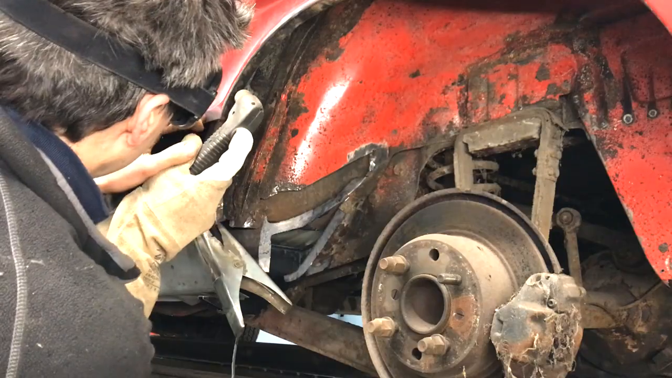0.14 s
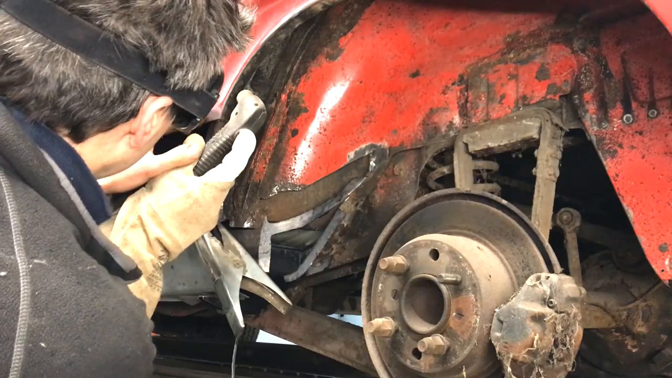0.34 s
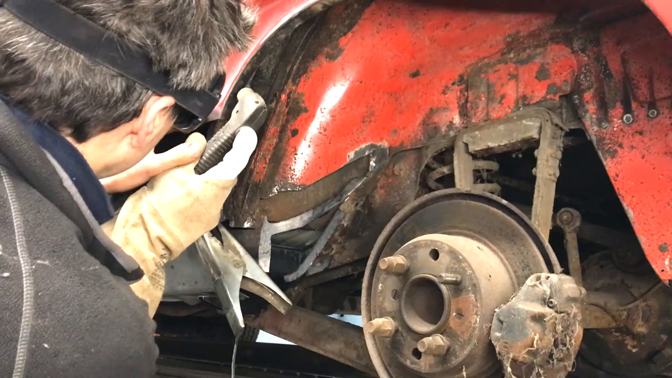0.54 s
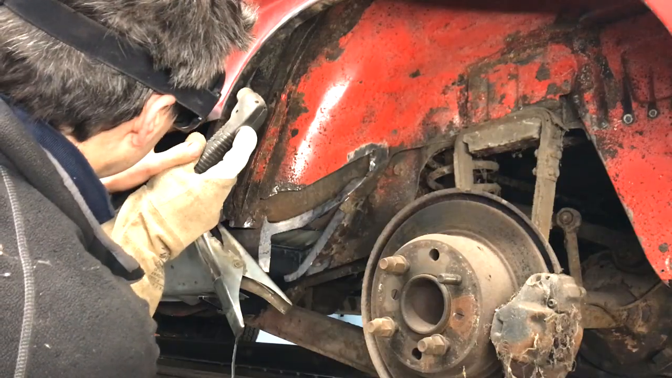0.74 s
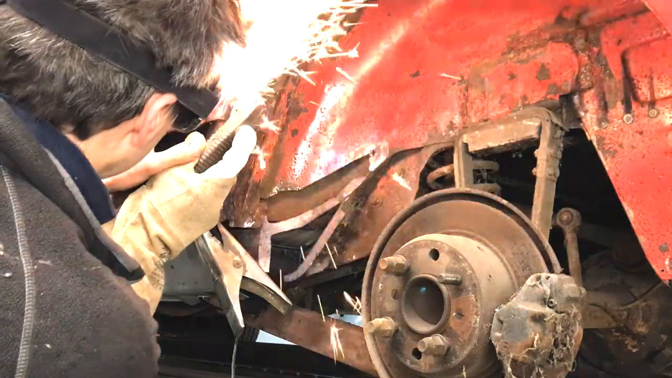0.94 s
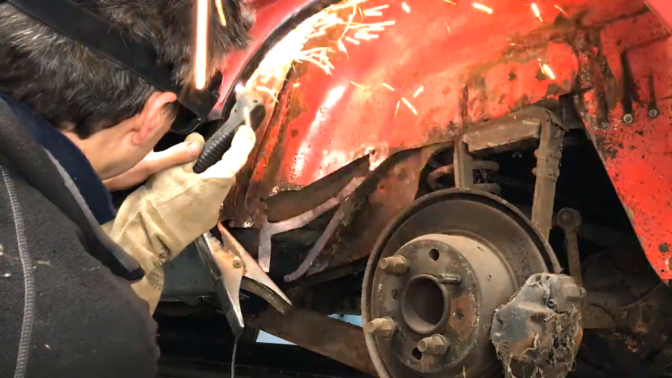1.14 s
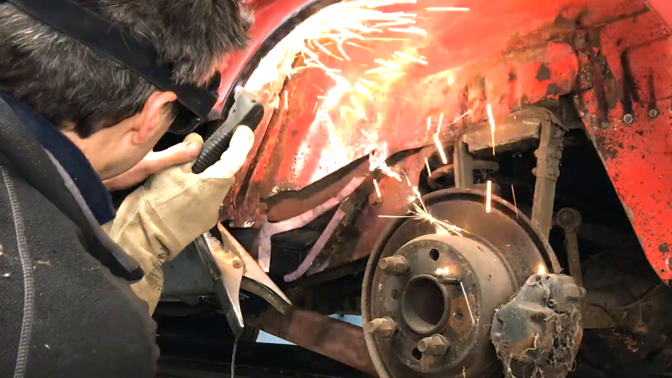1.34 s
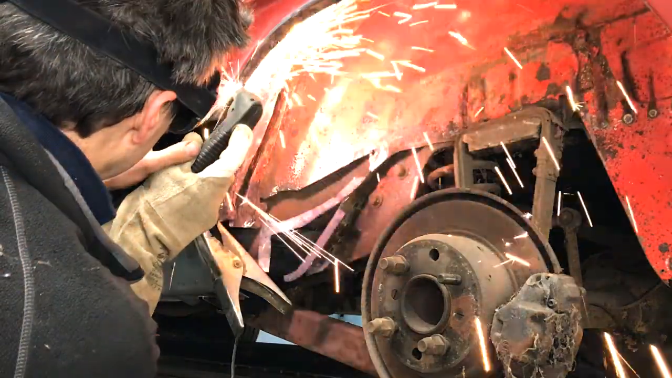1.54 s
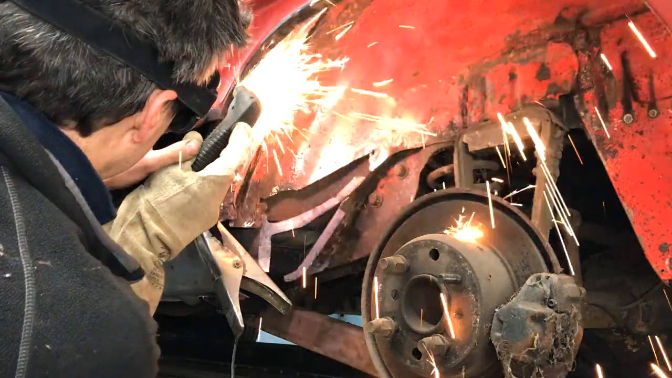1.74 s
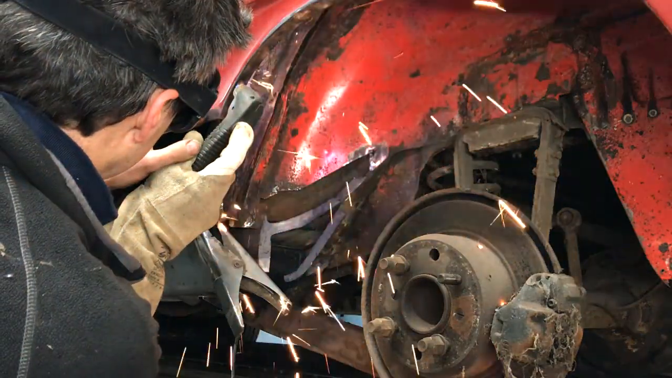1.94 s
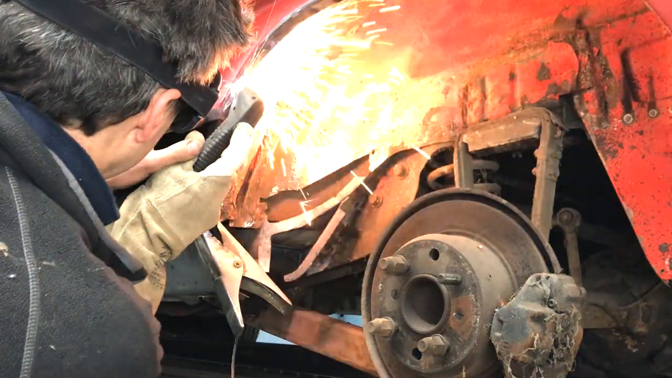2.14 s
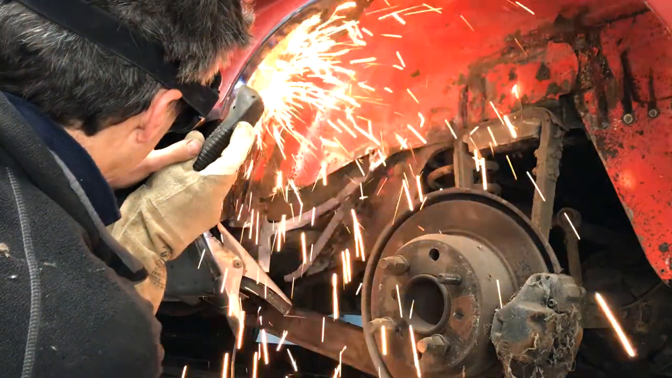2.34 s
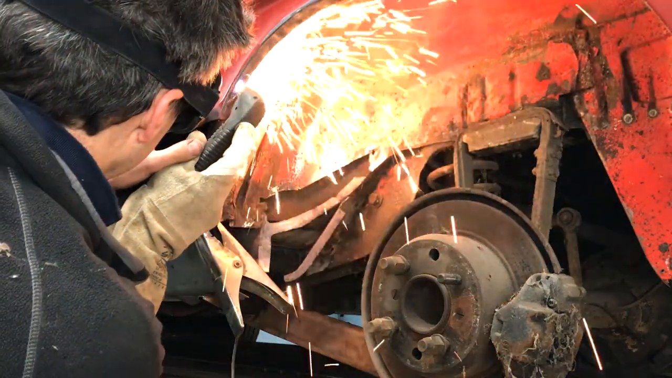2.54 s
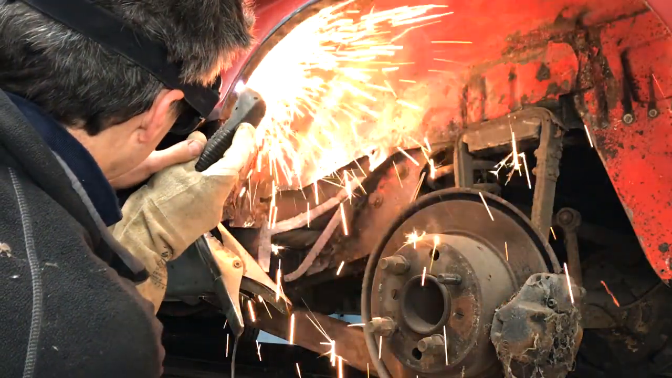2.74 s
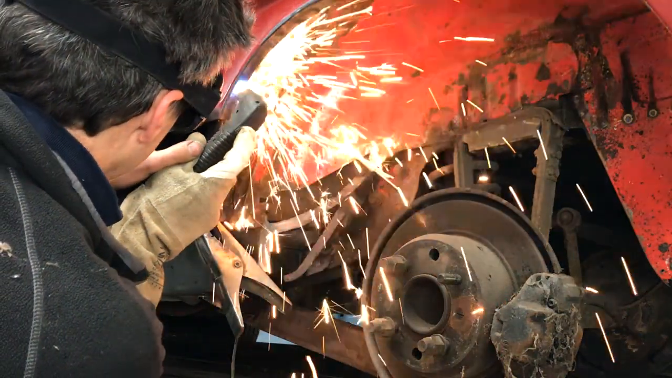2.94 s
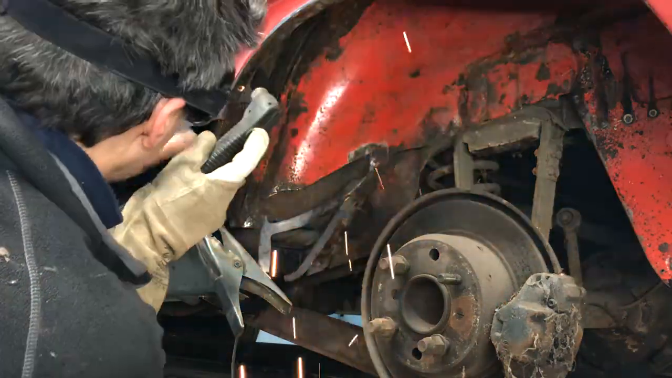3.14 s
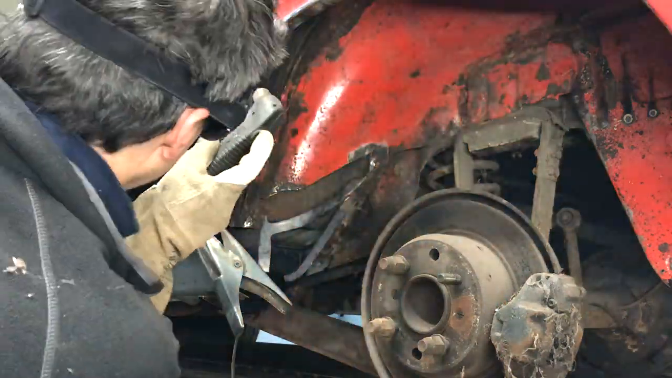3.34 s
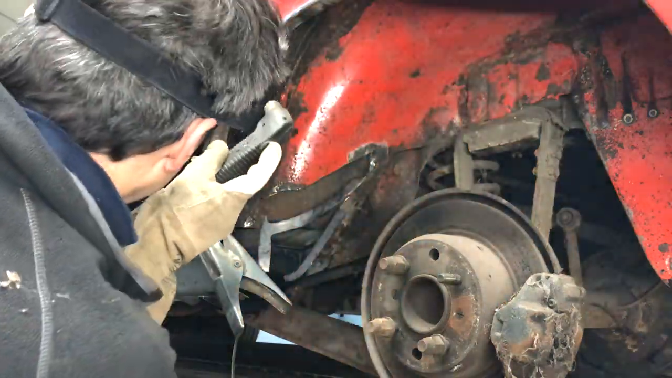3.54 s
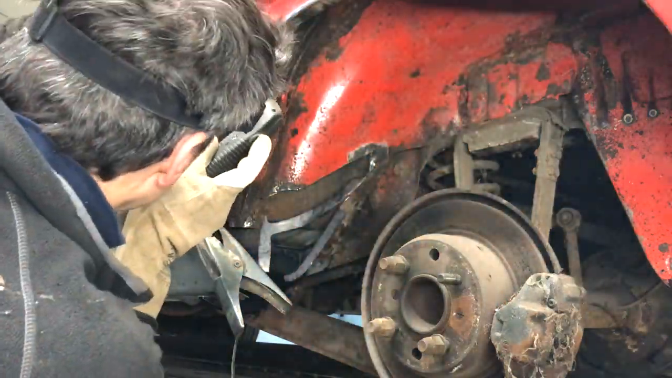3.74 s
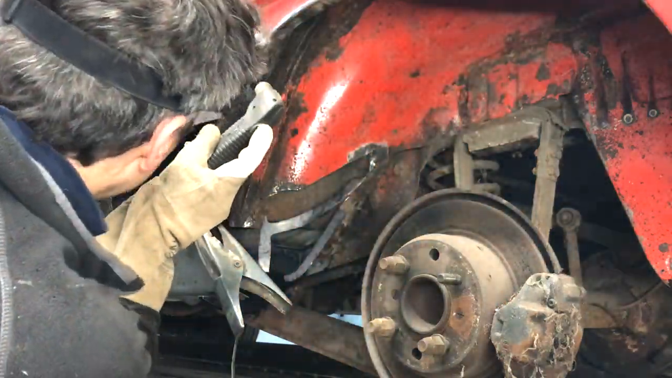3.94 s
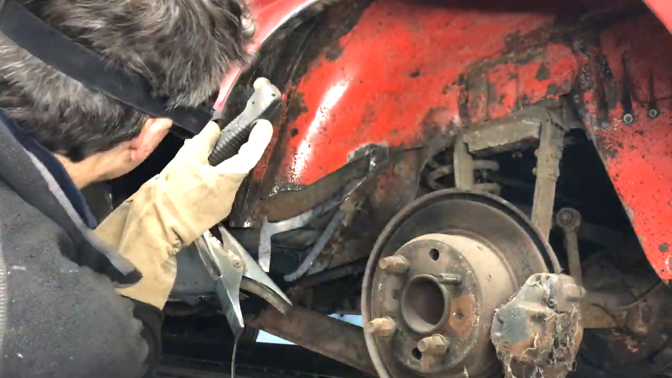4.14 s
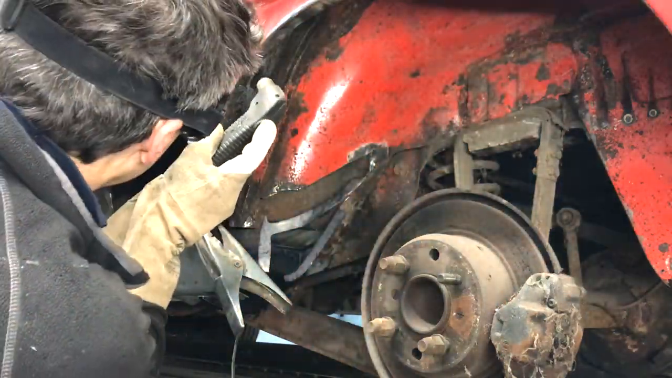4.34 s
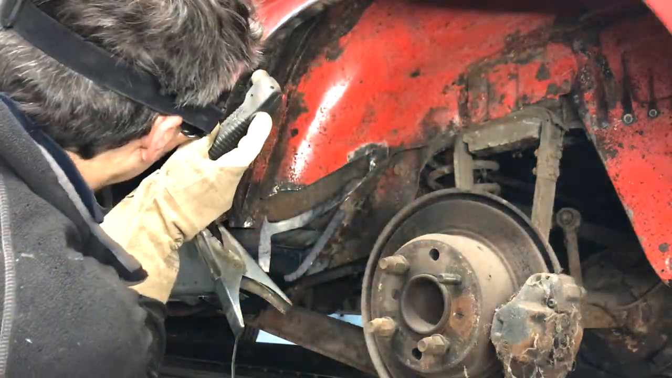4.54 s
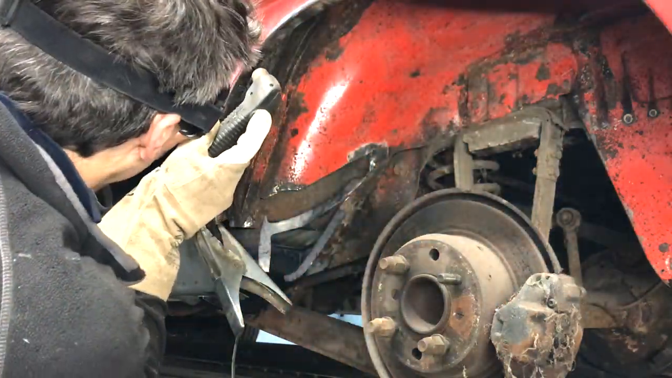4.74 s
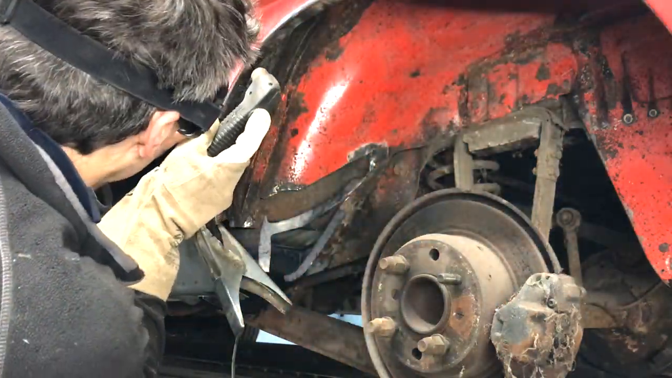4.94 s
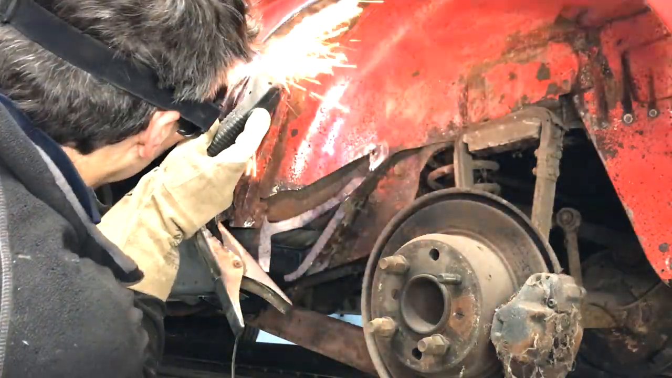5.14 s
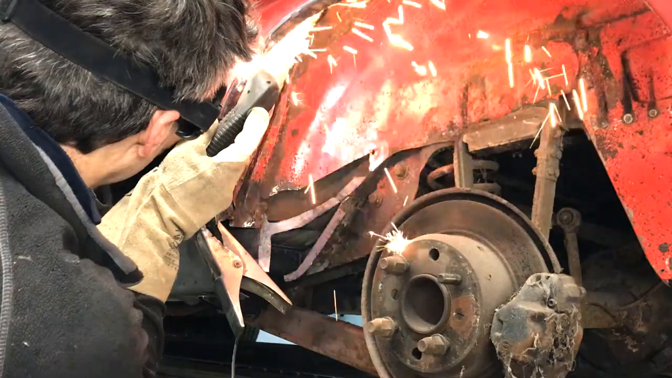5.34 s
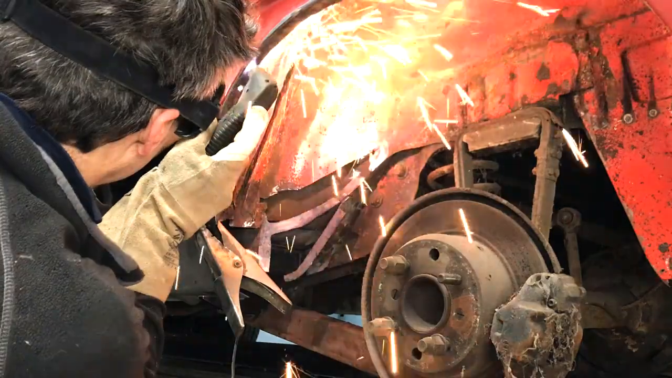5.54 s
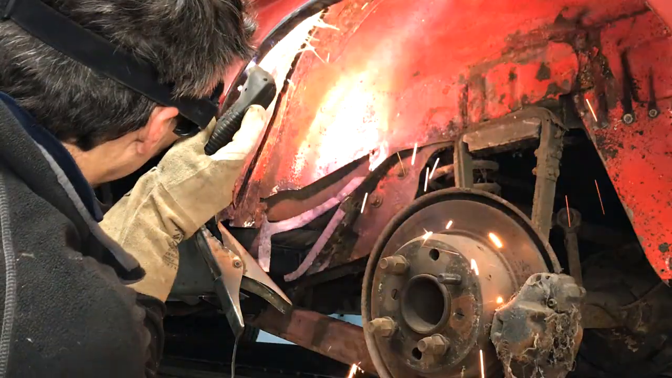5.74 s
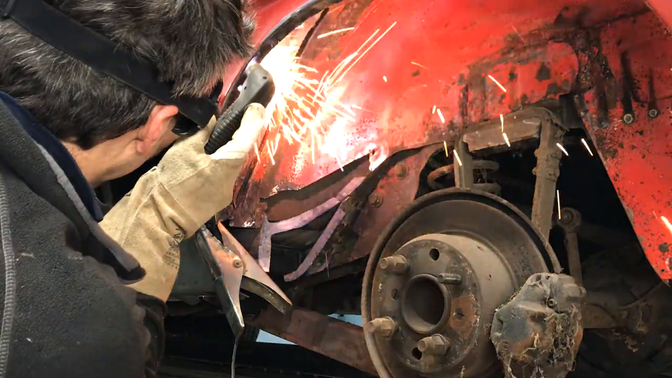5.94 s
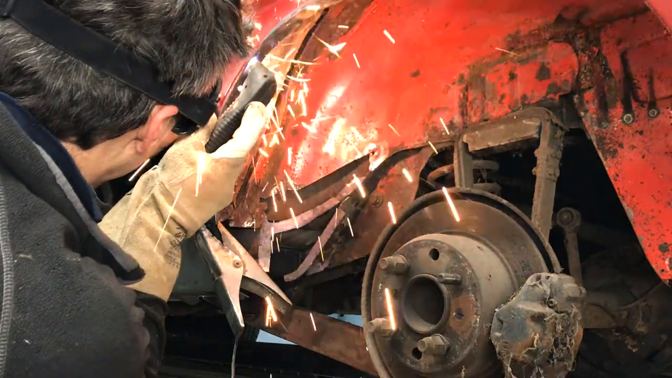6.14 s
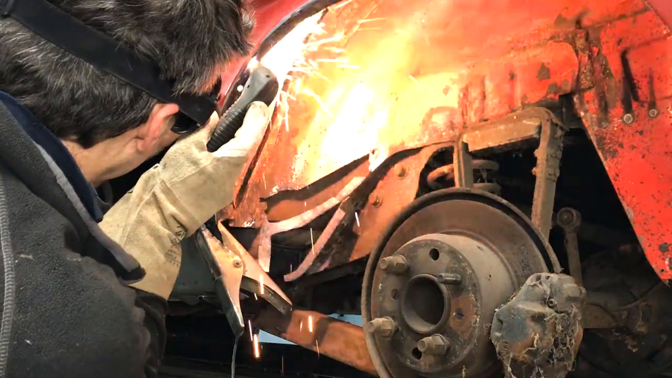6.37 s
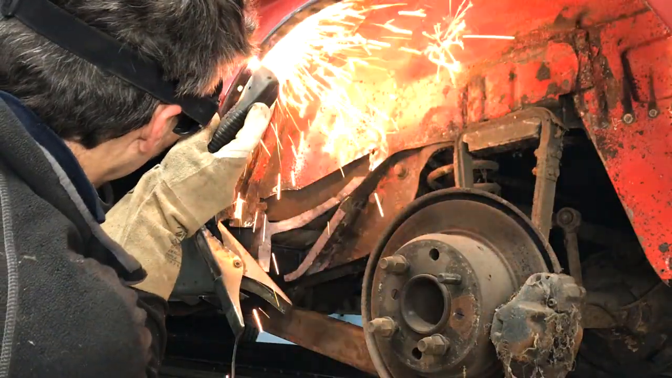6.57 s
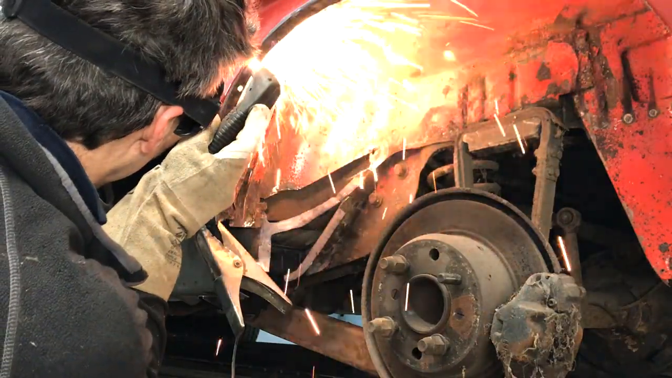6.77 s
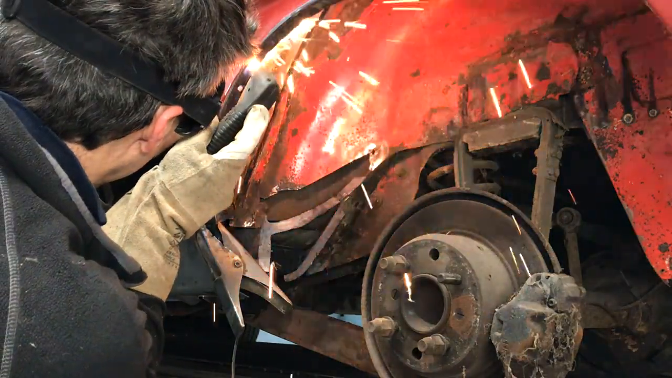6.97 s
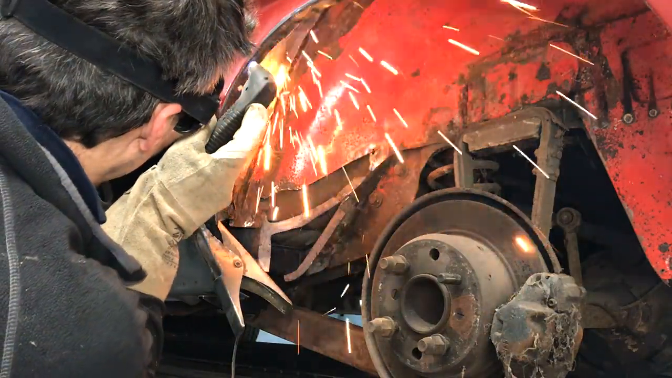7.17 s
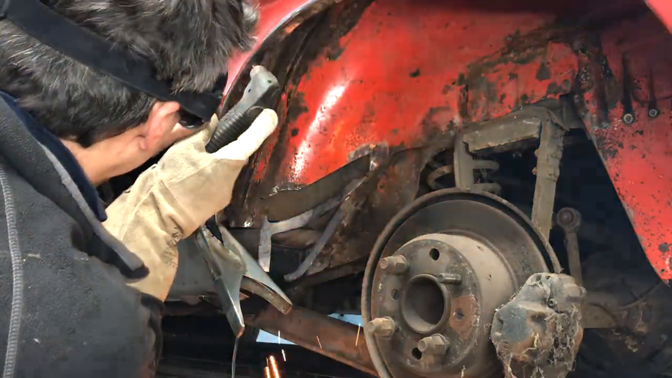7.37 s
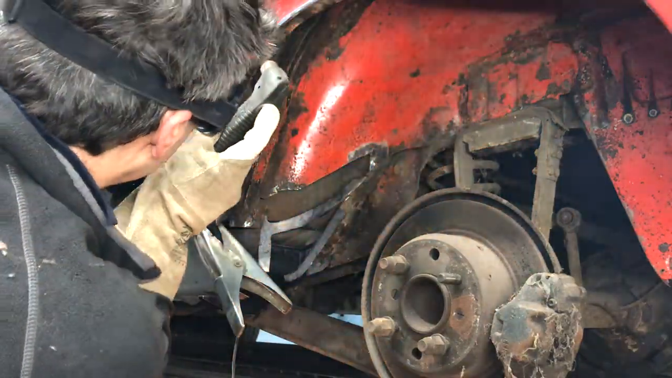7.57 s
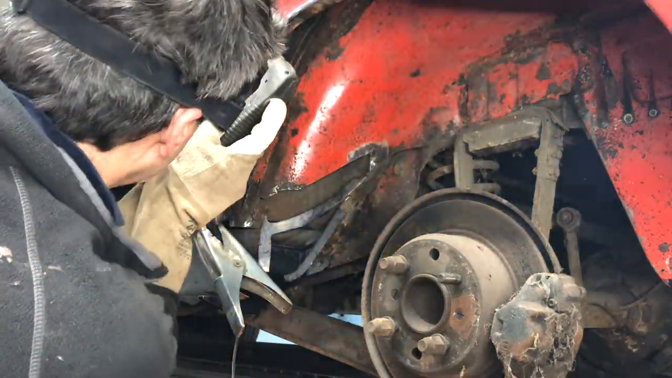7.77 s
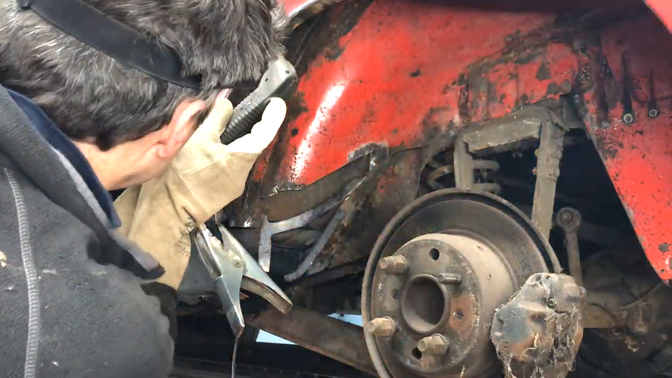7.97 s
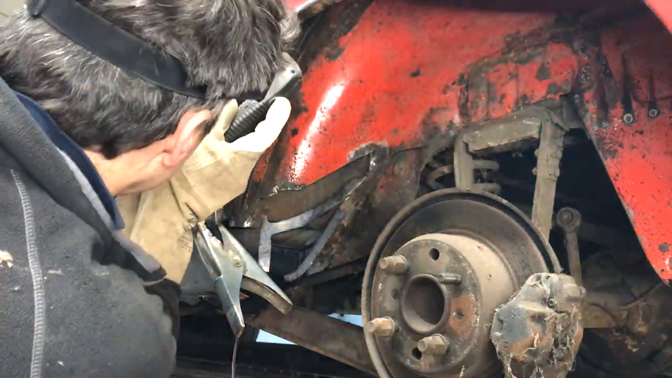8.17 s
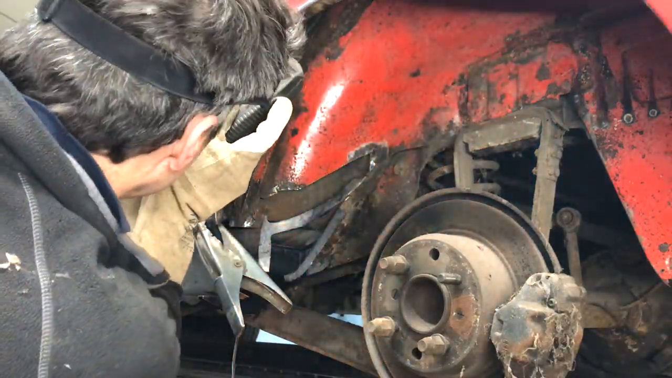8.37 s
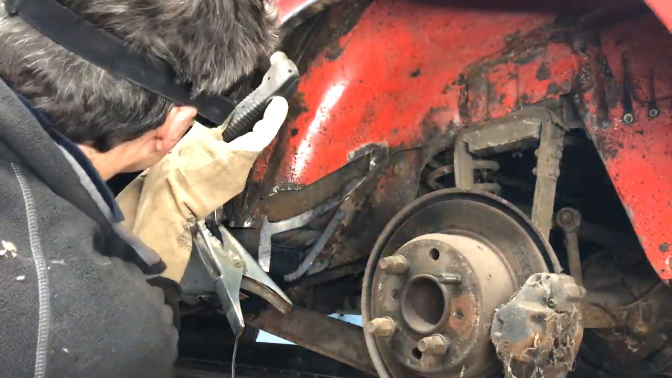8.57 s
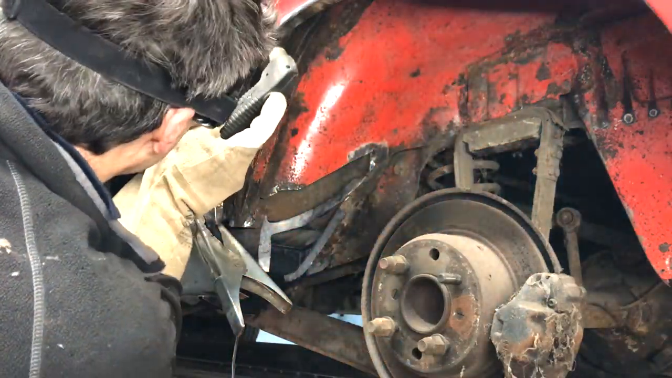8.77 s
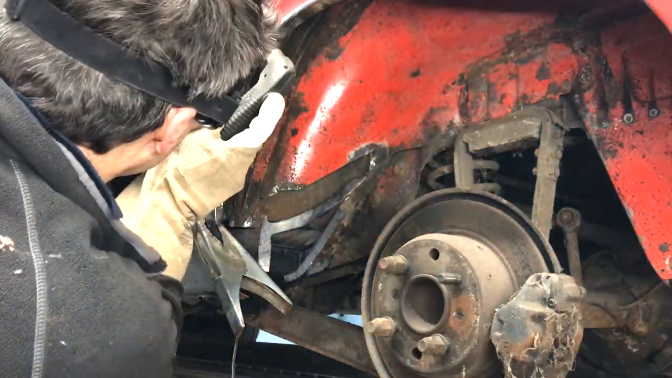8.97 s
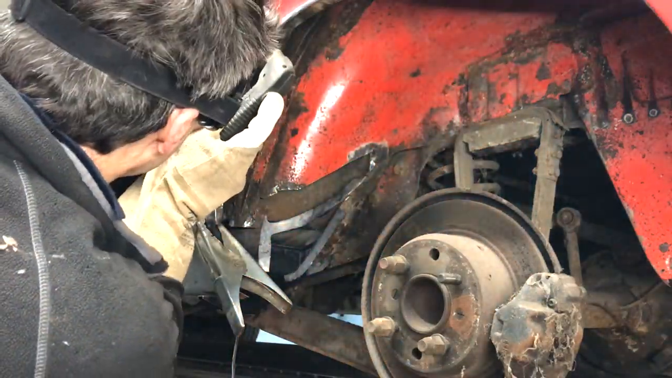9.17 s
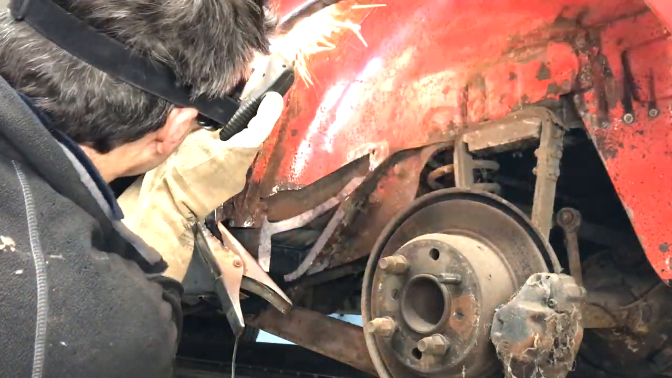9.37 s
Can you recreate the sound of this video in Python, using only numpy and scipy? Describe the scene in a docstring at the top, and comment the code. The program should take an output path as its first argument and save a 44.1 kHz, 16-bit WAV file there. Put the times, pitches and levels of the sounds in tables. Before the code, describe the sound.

Quiet workshop hum with small bumps and a trigger clack with a brief air puff. Then a plasma torch snaps alight and cuts a car's steel wheel arch for two seconds, a loud bright hiss with crackling sputters. Air hisses on, shuts with a clack, and the sequence repeats before a third blast of air alone. Close small microphone, short room echo.

```python
"""Plasma torch cutting a steel wheel arch

Close by in a workshop, a hand-held plasma torch makes two cuts: the trigger clacks, air hisses, the arc strikes.
Air and jet are coloured noise through gap resonances; molten steel sputters as clumped pops with deeper bursts.
After each cut the air swells as a lagging gain control recovers, then the valve shuts; a third blow ends the scene.
Dying modes make the clacks and bumps; low noise and two fan tones fill the pauses, under a short room echo."""
import sys
import numpy as np
from scipy import signal
from scipy.fft import rfft, irfft, next_fast_len
from scipy.io import wavfile
from scipy.ndimage import uniform_filter1d, map_coordinates

SR = 44100
rng = np.random.default_rng(int(sys.argv[2]) if len(sys.argv) > 2 else 0)


def int16_out(signal):
    """Quantize to a 16-bit WAV file."""
    q = np.round(np.clip(np.atleast_2d(signal).T, -1, 1) * 32767)
    wavfile.write(sys.argv[1], SR, q.astype(np.int16))


N = 414981
TIME = np.arange(N) / SR

# The arc in each cut. Each row: strikes in seconds, goes out in seconds.
CUTS = [(0.896, 3.047), (5.153, 7.407)]
# The air valve. Each row: opens in seconds, shuts in seconds.
AIR_RUNS = [(0.826, 4.812), (5.082, 9.075), (9.34, 13)]
# Colour of the air jet. Each row: frequency in Hz, relative density in dB per Hz.
JET_HISS = [(1500, -37.5), (3000, -8.5), (5600, -2), (8000, 0.5), (11000, -2), (13400, -2), (15500, -0.5)]


def gain_of(db):
    """Decibels to gain."""
    return 10 ** (np.asarray(db) / 20)


def evened(x):
    """Scales to an rms of 1."""
    return x / np.sqrt(np.mean(x ** 2) + 1e-20)


def read(points, hz):
    """Reads a table along a log-frequency axis."""
    f, value = np.transpose(points)
    return np.interp(np.log(hz + 1), np.log(f + 1), value)


def add(mix, s, sound):
    """Mixes a sound in at time s."""
    part = mix[max(round(s * SR), 0):][:len(sound)]
    part += sound[:len(part)]


def filtered(x, db_at):
    """Applies a gain in dB given as a function of frequency."""
    size = next_fast_len(len(x))
    gain = gain_of(db_at(np.fft.rfftfreq(size, 1 / SR)))
    return irfft(rfft(x, size) * gain, size)[:len(x)]


def coloured(x, spectrum):
    """Gives x a spectral tilt and an rms of 1."""
    return evened(filtered(x, lambda hz: read(spectrum, hz)))


def noise(spectrum):
    """Steady noise of rms 1 with this spectrum."""
    return coloured(rng.standard_normal(N), spectrum)


def wander(per_s):
    """Random drift of rms 1, in straight lines between so many new values a second."""
    steps = rng.standard_normal(N // 16)
    return evened(np.interp(TIME * per_s, np.arange(len(steps)), steps))


def since(s):
    """Seconds gone by since time s; 0 before it."""
    return np.maximum(TIME - s, 0)


def follow(rows, column):
    """Gain along one dB column of a curve whose first column is seconds."""
    rows = np.array(rows)
    return gain_of(np.interp(TIME, rows[:, 0], rows[:, column]))


def fan(shop_db=-46, swell_db=1.2):
    """Uneven workshop rumble and the slightly drifting sine tones of a cooling fan."""
    # Each row: frequency in Hz, rms level in dB.
    fan_tones = [(177, -59), (1238, -57)]
    # Workshop rumble. Each row: frequency in Hz, relative density in dB per Hz.
    shop_rumble = [(25, -34), (50, -9), (80, 3.5), (150, 3.5), (240, -1), (330, 2), (550, -4), (800, -6.5),
                   (1080, -3.5), (1700, -11.5), (3000, -19.5), (6000, -27.5), (10000, -38), (15500, -48)]
    tones = np.zeros(N)
    for hz, db in fan_tones:
        cycles = np.cumsum(hz + wander(10)) / SR
        tones += np.sqrt(2) * gain_of(db) * np.sin(2 * np.pi * cycles)
    return tones + gain_of(shop_db + swell_db * wander(16)) * noise(shop_rumble)


def workshop(x):
    """Room echo: a diffuse noise tail after a short gap, each band dying at its own speed."""
    # Each row: frequency in Hz, decay by 60 dB in seconds.
    room_decay = [(150, 0.92), (1000, 0.43), (5000, 0.41), (15000, 0.48)]
    burst = rng.standard_normal(SR // 2) * (TIME[:SR // 2] > .006)
    hz, t, bands = signal.stft(burst, SR, nperseg=256)
    t60 = read(room_decay, hz)[:, None]
    tail = signal.istft(bands * gain_of(-60 * t / t60), SR)[1]
    return signal.oaconvolve(x, tail / np.linalg.norm(tail))[:N]


def ring(modes, soft_s):
    """A blow with a softened onset sets several modes ringing, and each dies exponentially."""
    t = TIME[:SR // 2]
    ringing = np.zeros(len(t))
    for hz, db, t60 in modes:
        ringing += gain_of(db - 60 * t / t60) * np.sin(2 * np.pi * (hz * t + rng.random()))
    return (1 - np.exp(-t / soft_s)) * ringing


def handling(puff_s=.524, puff_db=-43, puff_t60=0.17, thud_t60=0.17):
    """Ringing valve clacks with noisy double snaps, one short puff from a trigger touch, and dull bumps."""
    # Trigger and air valve. Each row: time in seconds, relative ring in dB, snap in dB, snap t60 in seconds.
    clacks = [(0.523, -18, -21, 0.09), (0.802, -21.5, -19, 0.021), (4.801, -23.5, -41, 0.06),
              (5.078, -24, -19.5, 0.027), (9.06, -21.5, -39.5, 0.05), (9.334, -25, -17.5, 0.023)]
    # Dull bumps of torch and trigger. Each row: time in seconds, relative ring in dB, thud in dB.
    knocks = [(0.006, -33, -42), (0.247, -28, -33.5), (4.799, -44, -33), (9.057, -41, -31)]
    # Modes of valve and panel. Each row: frequency in Hz, relative level in dB, t60 in seconds.
    valve_modes = [(328, -2, .08), (585, -3, .16), (870, -7, .12), (1014, -4, .13), (1425, -5, .12),
                   (1625, -10, .17), (2420, -14, .18), (2670, -5, .05)]
    panel_modes = [(330, -10, .12), (501, 3, .15), (797, -9, .17), (865, -9, .15), (1340, -17, .13),
                   (2207, -25, .12)]
    # Colours of snap and thud. Each row: frequency in Hz, relative density in dB per Hz.
    snap_colour = [(60, -27), (300, 1), (1500, -4), (2700, -5.5), (5000, -7), (9000, -10), (15000, -7.5)]
    thud_colour = [(60, -3), (300, 2), (900, 2.5), (1400, -8), (2200, -18), (6000, -25), (12000, -43),
                   (16000, -48)]
    lead_s, lead_db, lead_t60 = .005, -7, 0.05  # a lighter tick comes just before each clack
    rings, snaps, thuds, puff = np.zeros((4, N))
    t = TIME[:SR // 2]
    for s, ring_db, snap_db, t60 in clacks:
        add(rings, s, gain_of(ring_db) * ring(valve_modes, 0.0014) / 2)
        add(snaps, s, gain_of(snap_db - 60 * t / t60))
        add(snaps, s - lead_s, gain_of(snap_db + lead_db - 60 * t / lead_t60))
    for s, ring_db, thud_db in knocks:
        add(rings, s, gain_of(ring_db) * ring(panel_modes, 0.0025))
        add(thuds, s, gain_of(thud_db - 60 * t / thud_t60))
    add(puff, puff_s, gain_of(puff_db - 60 * t / puff_t60))
    return rings + snaps * noise(snap_colour) + thuds * noise(thud_colour) + puff * noise(JET_HISS)


def burning(strikes, goes_out, edge_s=.004):
    """1 while this arc burns, else 0, with short ramps between."""
    return np.clip(np.minimum(TIME - strikes, goes_out - TIME) / edge_s + .5, 0, 1)


def flow(fall_db_per_s, fill_s=0.011):
    """Cold air: pressure fills the hose as the valve opens, yields to the arc, bleeds away after shutting."""
    gain = np.zeros(N)
    for opens, shuts in AIR_RUNS:
        gain += (1 - np.exp(-since(opens) / fill_s)) * gain_of(-fall_db_per_s * since(shuts))
    return gain * (1 - sum(burning(*cut) for cut in CUTS))


def air(hiss_db=1.5, splash_db=-1.5, flutter_db=0.5, sway_db=0.36):
    """With no arc, compressed air hisses from the nozzle and splashes on the panel: two fluttering noises."""
    # Aim of the jet, before trims. Each row: time in seconds, nozzle hiss in dB, splash on the panel in dB.
    aim = [(0.85, -25.5, -30), (3.2, -26, -26.5), (3.36, -28.5, -28), (3.48, -25, -23), (3.55, -27, -30.5),
           (4.76, -25, -27), (5.1, -27, -27), (7.6, -22.5, -27), (7.97, -19.0, -21.5), (8.36, -22.5, -25.5),
           (8.5, -19.5, -24), (8.8, -22, -25.5), (9.4, -24.5, -29)]
    # Colours of hiss and splash. Each row: frequency in Hz, relative density in dB per Hz.
    hiss_colour = [(1000, -35), (3000, -12), (6000, -12.5), (9000, -1), (11000, 0.5), (13300, 0),
                   (14700, 5), (15800, -2)]
    splash_colour = [(200, -24), (750, -13), (1300, -15.5), (1850, -8.5), (2400, -11), (3100, -6.5),
                     (5500, 1), (7500, -1), (9500, -8), (15000, -25)]
    surge_db, surge_s = 4, 0.022  # a last gust of splash as the valve shuts
    gust_db = sum(surge_db * np.exp(-((TIME - shuts) / surge_s) ** 2) for _, shuts in AIR_RUNS)
    hiss = gain_of(hiss_db) * follow(aim, 1) * flow(fall_db_per_s=320) * noise(hiss_colour)
    splash_gain = gain_of(splash_db + gust_db) * follow(aim, 2) * flow(fall_db_per_s=220)
    splash = splash_gain * noise(splash_colour)
    return gain_of(flutter_db * wander(40) + sway_db * wander(9)) * (hiss + splash)


def bite(column):
    """Gain of the jet (column 1), the rush (2) or the spray (3) while the arc bites into the steel."""
    # One table a cut, before trims. Each row: time in seconds, jet hiss in dB, rush in the slit in dB,
    # molten spray in dB.
    cut_levels = [
        [(0.9, -16.5, -23.0, -33.0), (1.05, -15.0, -25, -32.5), (1.28, -14.5, -19.5, -20),
         (1.48, -12, -15.5, -23), (1.64, -14.5, -18.5, -45.5), (2.08, -12.0, -21.5, -33),
         (2.25, -12.5, -18, -18), (2.45, -13, -21.5, -34.5), (2.74, -13.5, -20.5, -7.5),
         (2.9, -13.5, -20.5, -22.5), (3.04, -13.5, -15.5, -31)],
        [(5.16, -19, -22, -35.5), (5.33, -17, -21.5, -15.5), (5.56, -16, -19, -26.5), (5.78, -15, -18, -25),
         (5.87, -14.5, -20.5, -39), (6.02, -13, -16.5, -17), (6.2, -15.5, -22, -33), (6.32, -12.5, -19, -9.5),
         (6.5, -14.5, -28.5, -21.5), (6.75, -17, -23.5, -22), (6.95, -14.0, -16.5, -26.5),
         (7.4, -10.5, -18.5, -23.0)],
    ]
    return sum(burning(*cut) * follow(rows, column) for cut, rows in zip(CUTS, cut_levels))


def crackle(spectrum, drops_per_s=2200, size_db=3.5, wash=.7, flicker_db=3.0):
    """Droplets of melt tear off as tiny random pops over a wash of noise, flickering together in clumps."""
    size = gain_of(size_db * np.minimum(rng.exponential(1, N), 3))
    pops = size * rng.choice([-1, 1], N) * (rng.random(N) < drops_per_s / SR)
    grains = evened(pops) + wash * rng.standard_normal(N)
    return coloured(grains * gain_of(flicker_db * wander(120)), spectrum)


def spray(spray_db=-2.0, surge_db=1.5, spits_per_s=8.1, spit_db=-3, sputter_s=0.03):
    """An uneven running crackle of melt, and deeper crackling bursts when a blob lets go."""
    # Blobs of melt that blow through. Each row: time in seconds, peak of the burst's envelope in dB.
    sputters = [(0.9, -28), (1.227, -19), (1.265, -16.5), (2.217, -15), (2.623, -13), (2.664, -16),
                (2.722, -9.5), (2.76, -5), (2.835, -14.5), (3.03, -21.5), (5.158, -20), (5.319, -13),
                (5.338, -13), (5.407, -18), (5.62, -23.5), (5.934, -14), (6.289, -10), (6.319, -13),
                (6.35, -13), (6.419, -11), (6.483, -15), (6.62, -18), (6.717, -15), (7.387, -12)]
    # Colours of spray and bursts. Each row: frequency in Hz, relative density in dB per Hz.
    spray_colour = [(25, -36), (50, -44), (90, -2), (350, 0.5), (750, -1.5), (1000, -4), (1900, 1),
                    (3500, -9), (7000, -11), (15000, -14.5)]
    burst_colour = [(25, -22), (50, -13), (85, 6.5), (150, 2), (450, 0.5), (1200, 0), (2200, -2),
                    (4500, -1.5), (8000, -7.5), (15000, -16)]
    # small blobs come at random, tied to the untrimmed spray level
    spits = rng.random(N) * (rng.random(N) < spits_per_s / SR)
    blobs = gain_of(spit_db) * bite(3) * spits
    for s, db in sputters:
        blobs[round(s * SR)] += gain_of(db)
    u = TIME[:SR // 4] / (sputter_s / 2)
    swell_and_die = 2 * np.sqrt(u) * np.exp(-u ** 2 / 2 - u / 2)
    bursts = signal.oaconvolve(blobs, swell_and_die)[:N]
    running = gain_of(spray_db + surge_db * wander(20)) * bite(3)
    return running * crackle(spray_colour) + bursts * crackle(burst_colour)


def arc(rush_db=-2, flutter_db=0.65, grit_db=0.7, sway_db=0.4, strike_db=-21, strike_t60=0.064):
    """The arc strikes with a snap; then the hot jet hisses and rushes through the slit, shaking as noise."""
    # Rush in the slit. Each row: frequency in Hz, relative density in dB per Hz.
    rush_colour = [(1200, -12.5), (1800, -6), (2350, -11.5), (2900, -1.5), (3600, -6), (5000, -4),
                   (6500, -18.5), (10000, -23)]
    snaps = np.zeros(N)
    for strikes, _ in CUTS:
        snaps += (TIME > strikes) * gain_of(strike_db - 60 * since(strikes) / strike_t60)
    shake = gain_of(sway_db * wander(12) + flutter_db * wander(70) + grit_db * wander(900))
    jet = (bite(1) + snaps) * noise(JET_HISS)
    rush = (gain_of(rush_db) * bite(2) + snaps) * noise(rush_colour)
    return shake * (jet + rush)


def wheel_arch(x, count=6):
    """The arch and the brake parts throw back a few early echoes, which ripple the hiss."""
    echoes = np.zeros(SR // 100)
    echoes[rng.integers(SR // 1000, SR // 160, count)] = .135 * rng.choice([-1, 1], count)
    echoes[0] = 1
    return signal.oaconvolve(x, echoes / np.linalg.norm(echoes))[:N]


def nozzle_gap(x, turn_s=0.15, gap_db=0.21):
    """The gap between nozzle and panel resonates, fading from pose to pose and trembling with the hand."""
    # Resonances for each way the torch is held. Each row: frequency in Hz, width in Hz, lift in dB
    # before the whole response is evened.
    arc_start = [(2705, 460, 7), (3760, 220, 2), (4860, 630, 3), (7190, 180, 4.0), (7860, 230, -0.5),
                 (11000, 610, 4.5), (12800, 350, 3.9)]
    piercing = [(3010, 570, 7.6), (3920, 180, 6.6), (5130, 410, 7.8), (6700, 1010, 3.4), (8000, 1200, 1),
                (9680, 270, 4.1), (12280, 280, 5.8), (12470, 140, 6), (14690, 720, 2.0)]
    first_cut = [(3007, 520, 6.4), (3970, 240, 5.5), (5290, 520, 5), (6800, 920, 4.6), (7800, 340, 3.1),
                 (8890, 670, 6), (10830, 750, 6.8), (12100, 190, 4.5), (12300, 540, 4.5)]
    lifted = [(3010, 370, 5.1), (5100, 220, 2.8), (6740, 180, 3.5), (9500, 1500, 2.6), (10900, 220, 1.6),
              (12270, 340, 1.1)]
    second_cut = [(2980, 660, 5.1), (5130, 370, 1.8), (6300, 700, 3.1), (7340, 230, 4.0), (8880, 500, 5.8),
                  (9900, 360, 4.4), (11450, 1100, 4.5), (13000, 480, 6.4), (14340, 530, 5.1)]
    end_of_cut = [(3210, 560, 6.9), (4030, 290, 5.3), (4630, 190, 5.7), (6230, 310, 5.4), (7360, 370, 5.8),
                  (8070, 340, 6.1), (9080, 750, 6.4), (10680, 290, 4.5), (11840, 860, 4.4)]
    hovering = [(3160, 330, 3.2), (4020, 290, 3.6), (6000, 780, 5.5), (7040, 500, 5.5), (8000, 230, 5.8),
                (9300, 650, 3.4), (10540, 460, 5.5), (11900, 500, 3.1), (15300, 350, 3.1)]
    # Each row: time in seconds of the turn to this pose, its resonances.
    poses = [(0, arc_start), (1.03, piercing), (1.6, first_cut), (3.08, lifted),
             (5.05, second_cut), (6.55, end_of_cut), (7.45, hovering)]
    turns = [np.clip((TIME - s) / turn_s + .5, 0, 1) for s, _ in poses[1:]]
    reached = [np.ones(N)] + turns + [np.zeros(N)]
    hz = np.fft.rfftfreq(1024, 1 / SR)
    out = np.zeros(N)
    for k, (_, modes) in enumerate(poses):
        lift_db = sum(db * .5 ** ((2 * (hz - f) / width) ** 2) for f, width, db in modes)
        response = np.fft.fftshift(irfft(evened(gain_of(lift_db))))
        echoed = wheel_arch(x)  # each pose has its own echo paths
        out += (reached[k] - reached[k + 1]) * signal.oaconvolve(echoed, response, "same")
    tremble_s = .00025 * wander(14)
    return gain_of(gap_db) * map_coordinates(out, [(TIME + tremble_s) * SR], order=3)


def dips(x, depth=1.2, s_per_db=.00082, tone_db=-4.5, tone_s=.048, count=7):
    """The level drops out for an instant while the strongest pitches around it whistle on as sines."""
    # Each row: time in seconds, relative depth in dB (deepened by the depth factor; deeper ones last longer).
    dropouts = [(1.009, 19), (1.158, 14), (1.309, 17), (1.532, 31), (2.013, 14), (2.353, 17), (2.398, 15),
                (2.823, 13.5), (2.879, 32.5), (2.929, 13.5), (3.527, 17.5), (4.914, 10), (4.979, 10),
                (6.15, 18), (6.236, 15), (6.942, 17), (7.207, 30), (7.848, 35.5), (8.071, 16), (8.219, 14),
                (8.263, 14.5), (8.401, 35), (8.455, 16.5), (8.86, 14.5), (9.139, 13)]
    gain_db, tones = np.zeros(N), np.zeros(N)
    t = np.arange(-SR // 25, SR // 25) / SR
    swell = np.exp(-abs(2 * t / tone_s) ** 3)
    for s, db in dropouts:
        start = s + t[0]
        add(gain_db, start, -depth * db * .5 ** (abs(2 * t / (db * s_per_db)) ** 3))
        around = x[round(start * SR):][:len(t)] * evened(swell)
        power = uniform_filter1d(abs(rfft(around)) ** 2, size=9)
        peaks = signal.find_peaks(power, distance=20)[0]
        top = peaks[np.argsort(-power[peaks])[:count]]
        cycles = np.outer(top * SR / len(t), t) + rng.random((count, 1))
        chord = power[top] @ np.sin(2 * np.pi * cycles)
        add(tones, start, gain_of(tone_db) * np.std(around) * evened(chord) * swell)
    return x * gain_of(gain_db) + tones


def scene(room_db=-13):
    """The torch close by, its echo in the workshop, and the fan behind it."""
    near = nozzle_gap(air() + arc()) + spray() + handling()
    mono = dips(near + gain_of(room_db) * workshop(near) + fan())
    return np.array([mono, mono])


def gain_control(x, threshold_db=-22.5, ratio=4.6, lag_s=0.076):
    """Turns loud stretches down with a lag: each strike flares, and the air sounds faint just after a cut."""
    power = uniform_filter1d((x ** 2).mean(0), SR // 50)
    power_db = 10 * np.log10(abs(power) + 1e-12)
    cut_db = np.maximum(power_db - threshold_db, 0) * (1 - 1 / ratio)
    r = np.exp(-1 / (lag_s * SR))
    lagging_db = signal.lfilter([(1 - r) ** 2], [1, -2 * r, r * r], cut_db)
    return x * gain_of(-lagging_db)


def record(dry, low_cut_hz=52, edge_hz=15950):
    """One small microphone on both channels: rides the gain, thins the bass, rounds peaks, limits the band."""
    low_cut = signal.butter(2, low_cut_hz, "highpass", fs=SR, output="sos")
    thin = signal.sosfilt(low_cut, gain_control(dry))
    rounded = thin / (1 + (thin / .8) ** 4) ** .25
    band_limit = signal.firwin(601, edge_hz, window=("kaiser", 9), fs=SR)
    return signal.oaconvolve(rounded, band_limit[None], "same")


dry = scene()
out = record(dry)
int16_out(out)
```